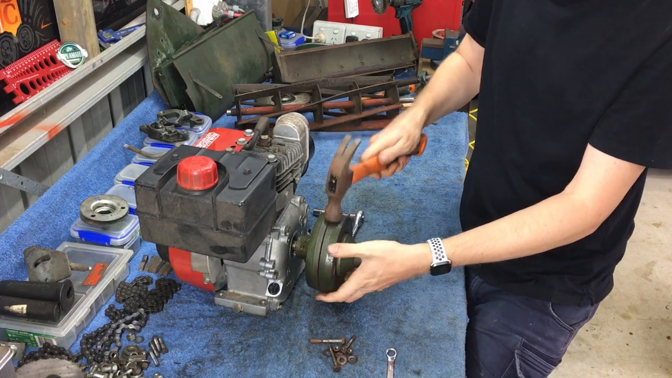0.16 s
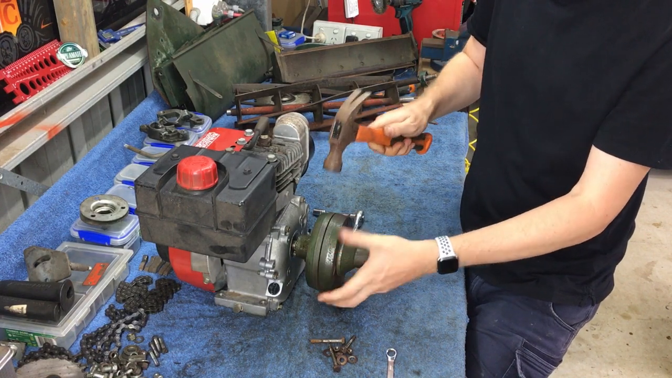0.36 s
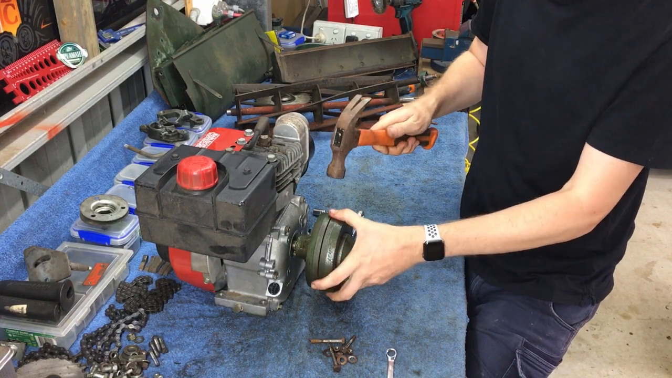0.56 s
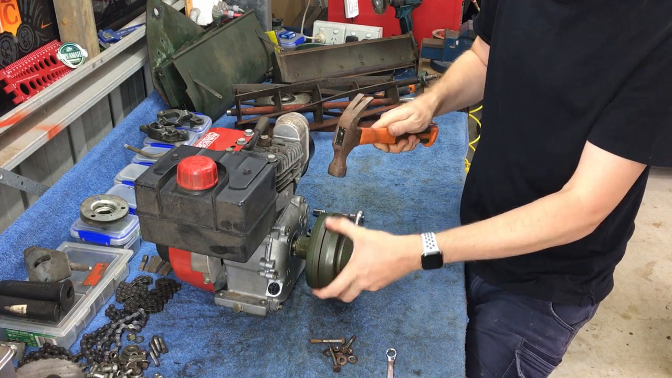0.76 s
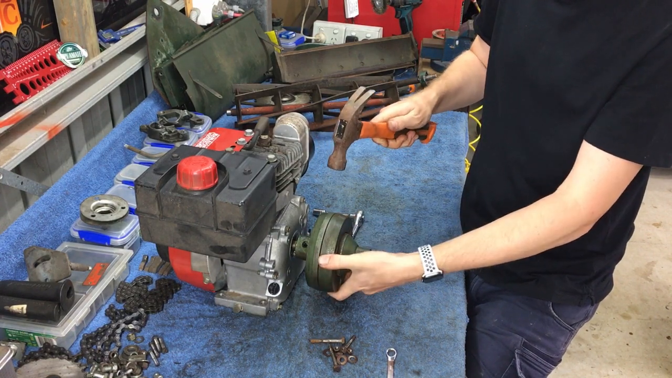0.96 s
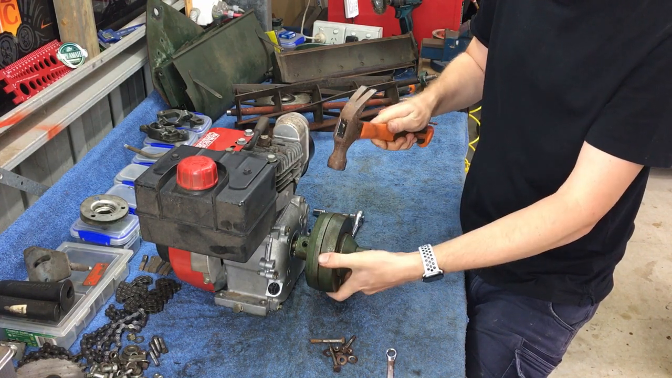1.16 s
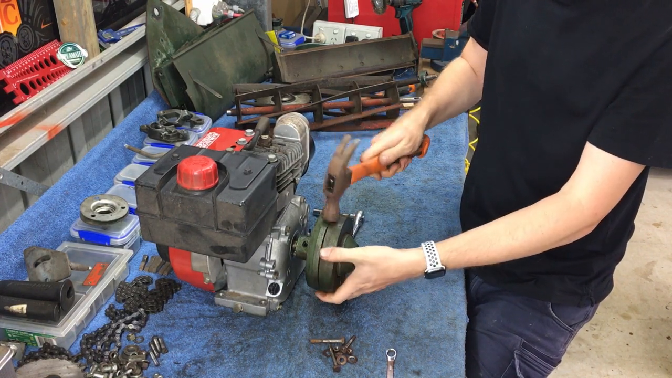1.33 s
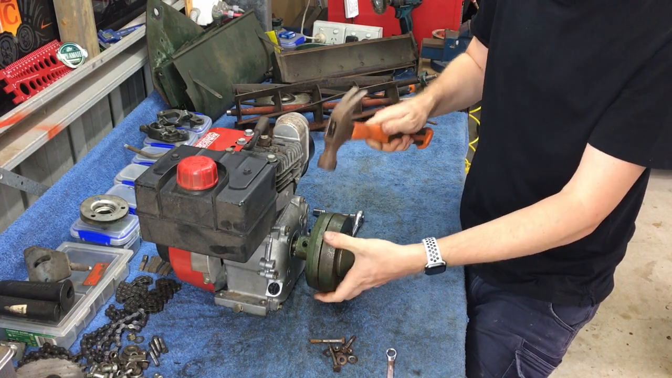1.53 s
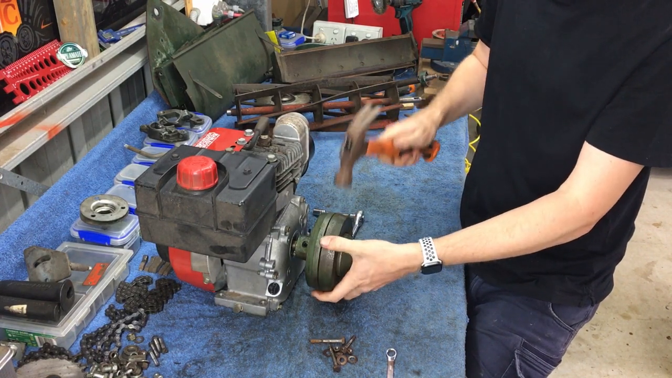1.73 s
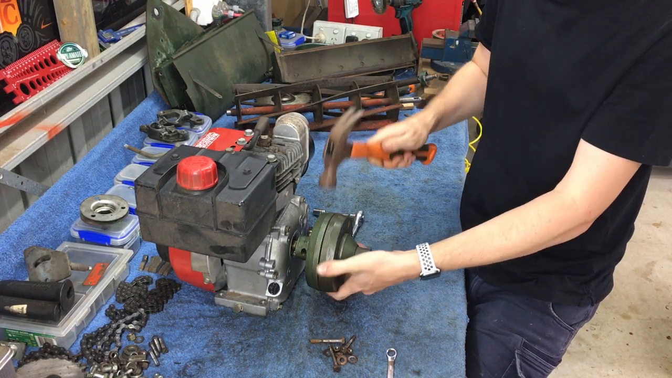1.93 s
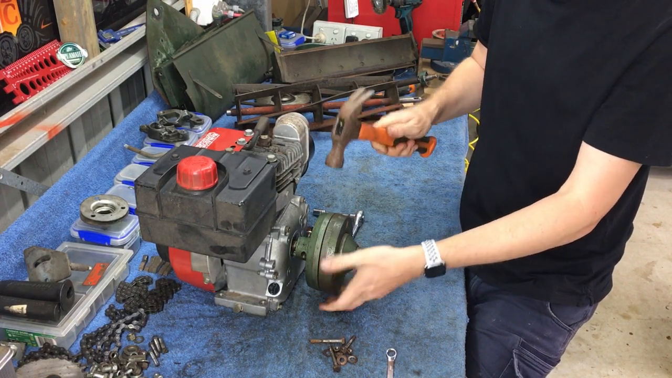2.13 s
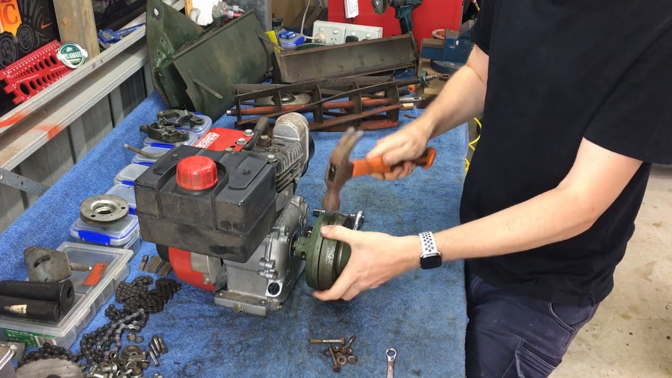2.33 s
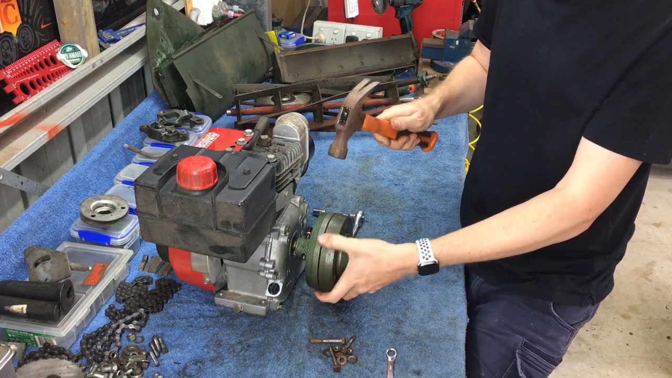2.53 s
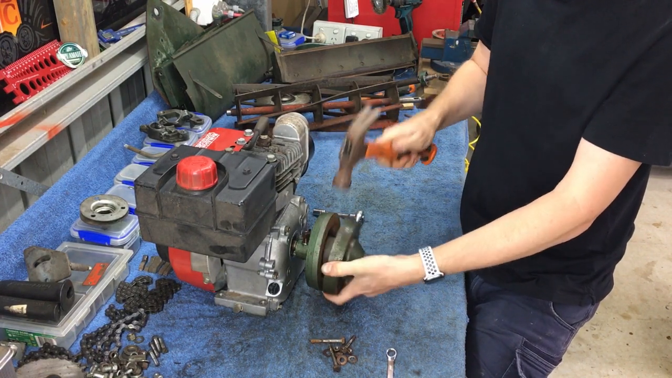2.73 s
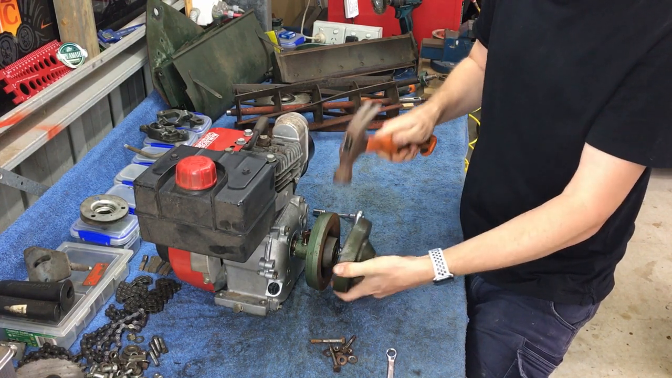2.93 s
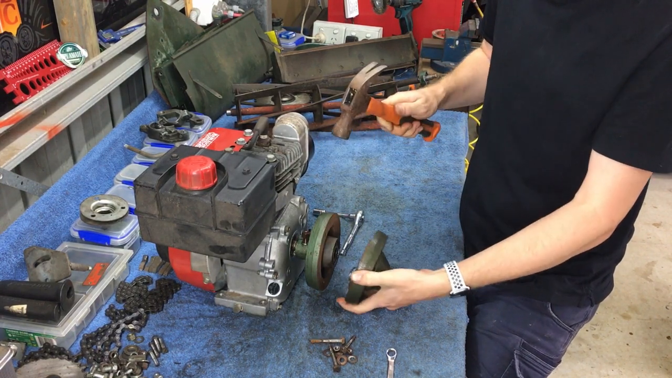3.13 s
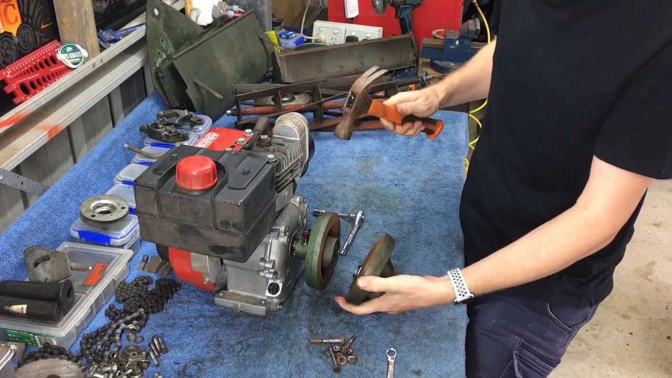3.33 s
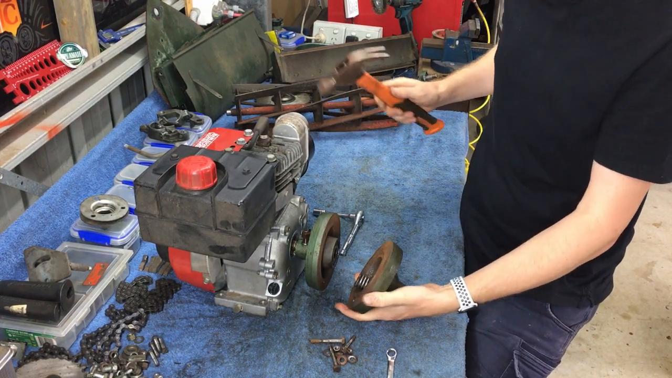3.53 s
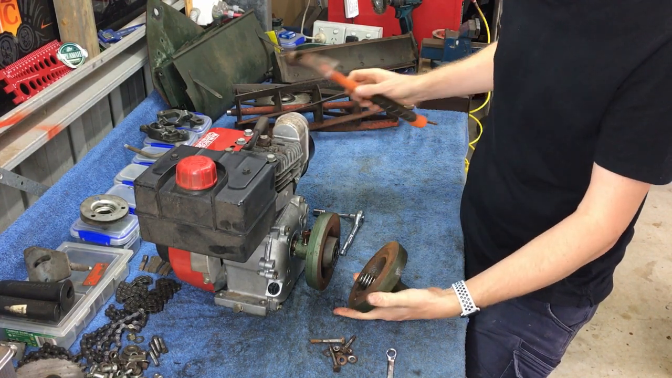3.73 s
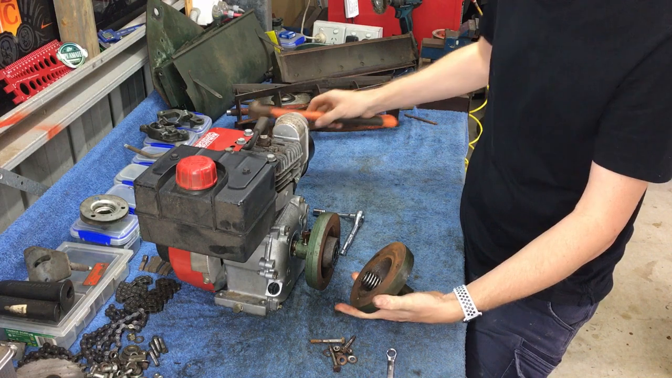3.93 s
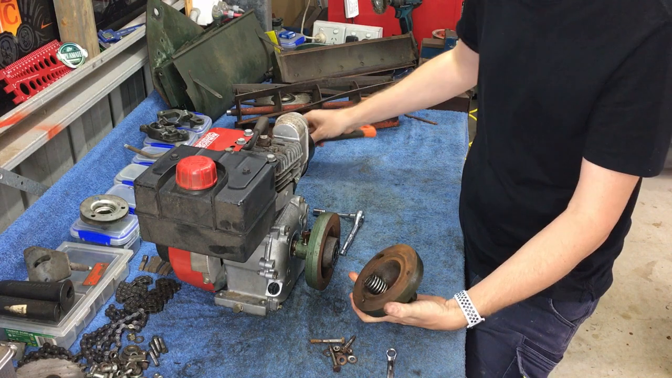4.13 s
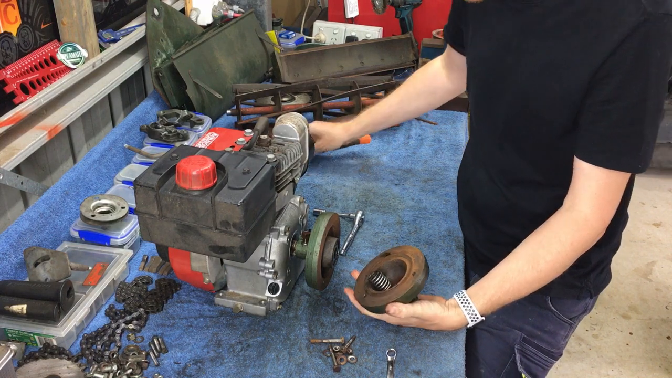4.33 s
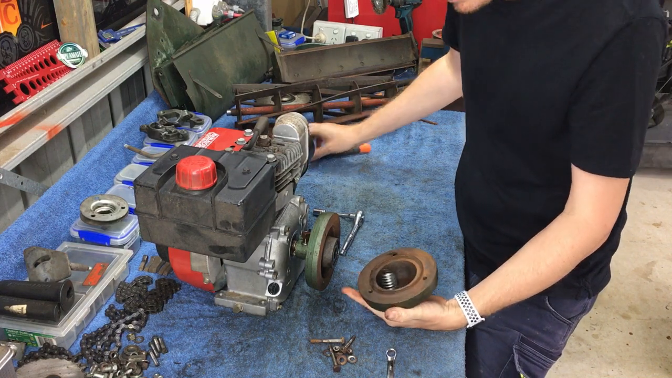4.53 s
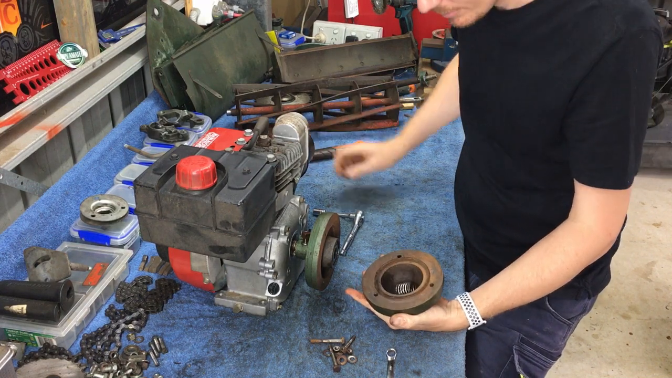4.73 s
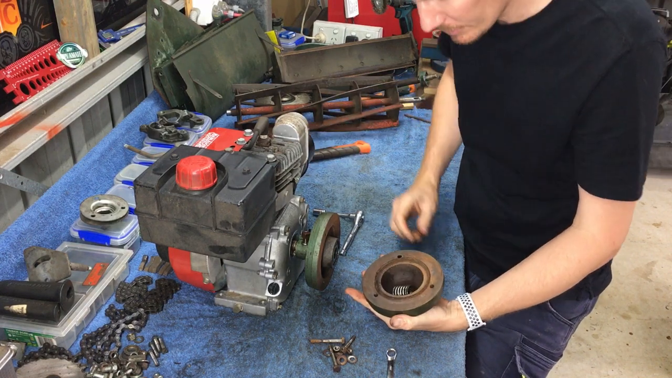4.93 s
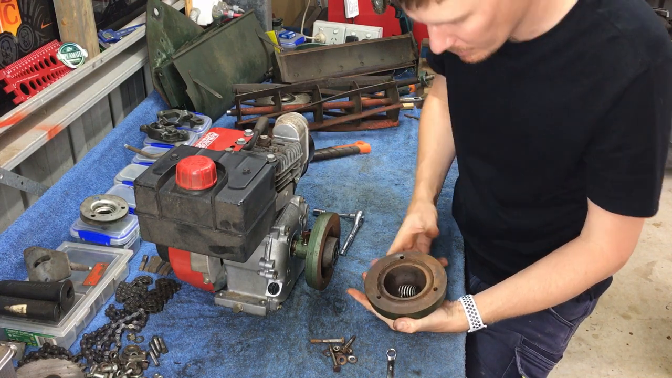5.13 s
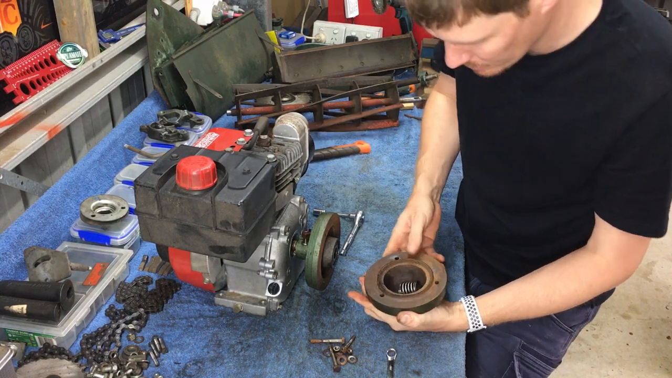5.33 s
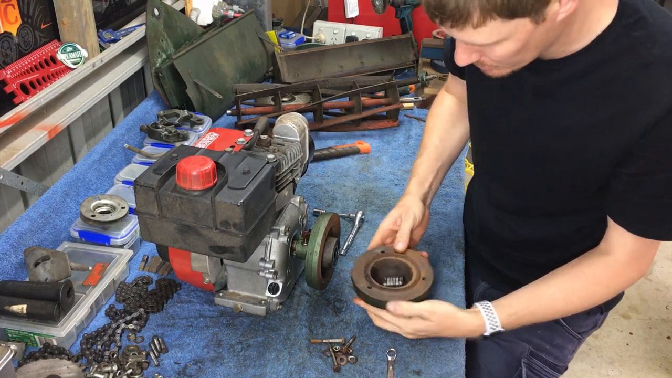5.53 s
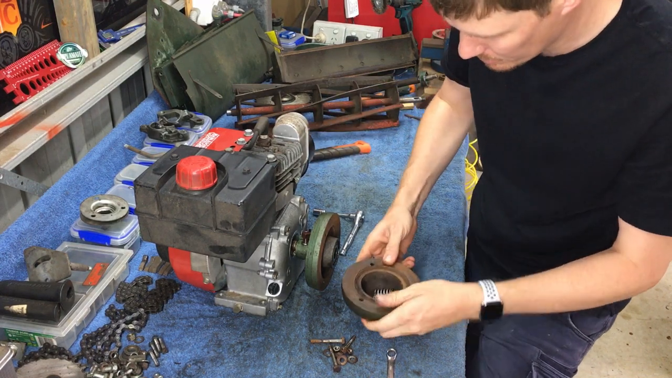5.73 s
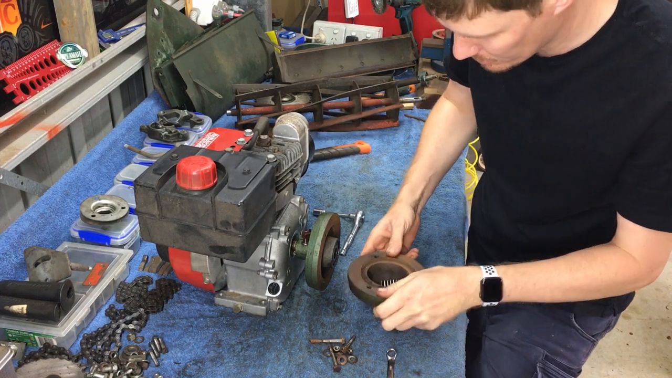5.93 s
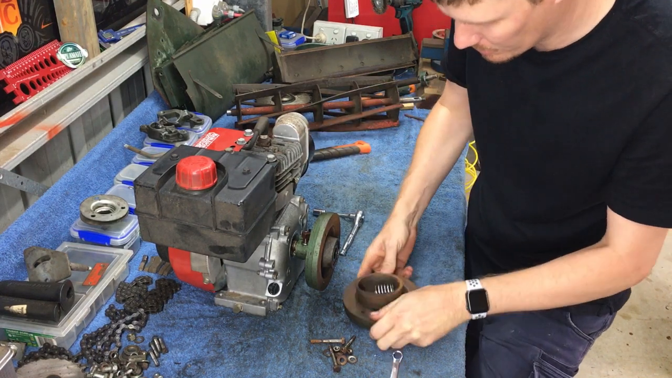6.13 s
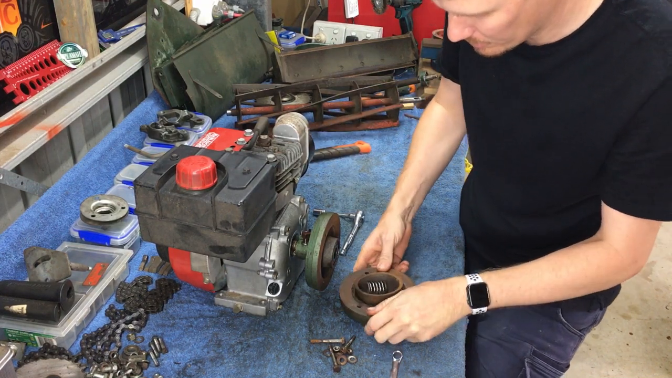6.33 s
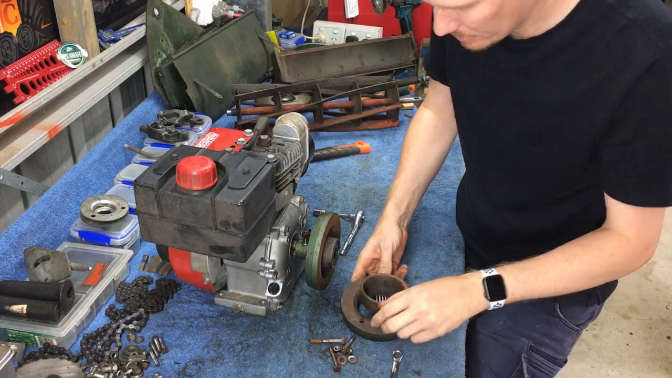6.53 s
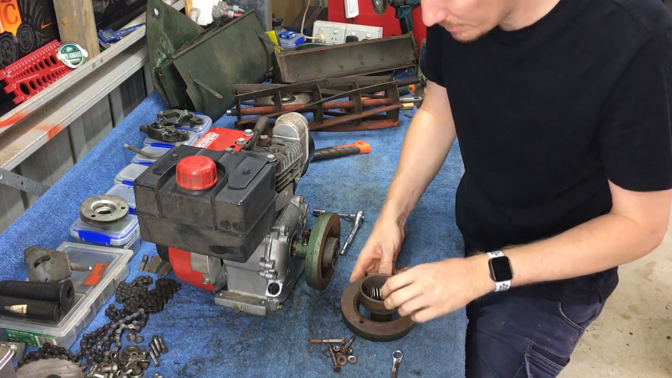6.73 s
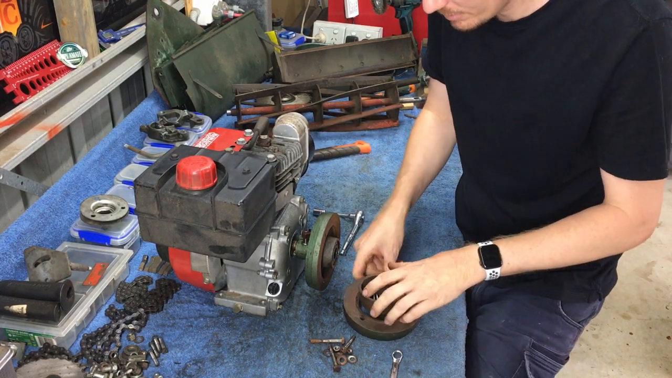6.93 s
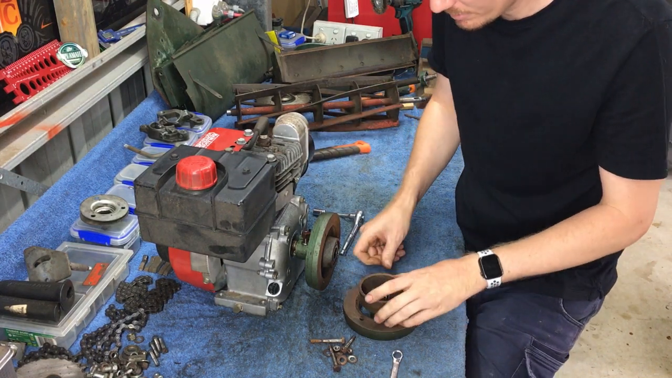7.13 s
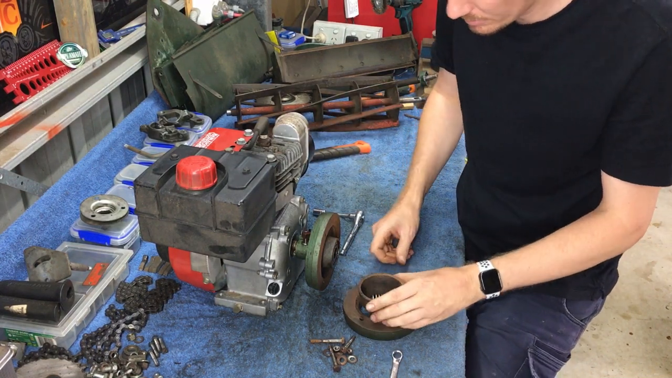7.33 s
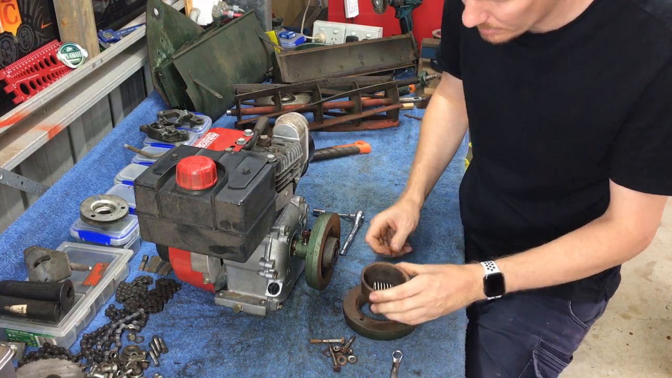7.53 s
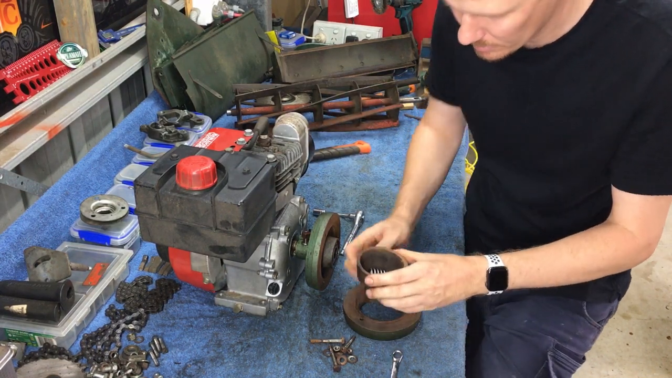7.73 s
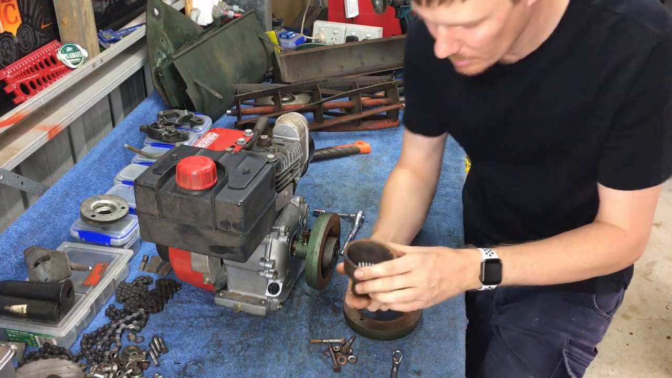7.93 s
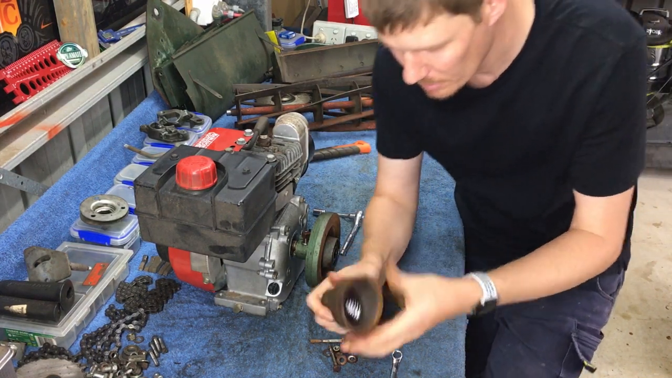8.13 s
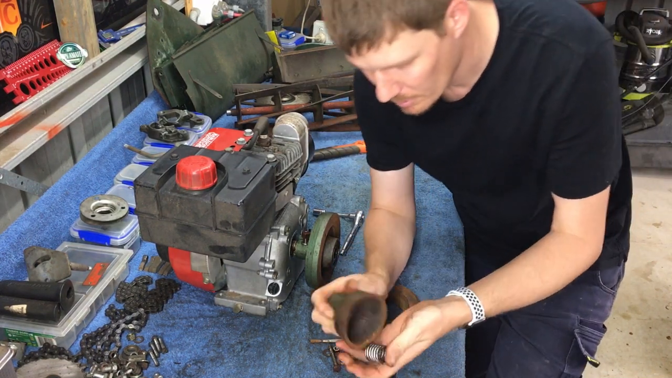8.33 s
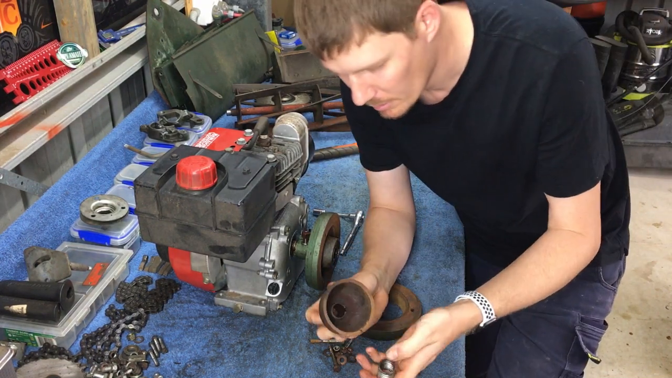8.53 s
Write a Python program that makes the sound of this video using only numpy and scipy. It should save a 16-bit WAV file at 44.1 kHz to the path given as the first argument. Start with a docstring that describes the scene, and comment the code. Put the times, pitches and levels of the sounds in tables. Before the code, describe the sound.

Sharp steel hammer blows ring in a small workshop, followed by soft thumps, a heavy clack, loose metal clinks and a faint gritty scrape.

```python
"""Hammer blows on steel first: a claw hammer taps a small engine's clutch on a mat until the drum comes free.
The hammer and the drum are set down, the drum rocks, and its hub is slid out as loose parts clink.
Steel and bench are sums of decaying sine modes; cracks, knocks, clacks and scrapes are shaped noise.
A small, cluttered workshop surrounds the microphone: noise tails answer the work over a low steady rumble."""
import sys
import numpy as np
from scipy import signal
from scipy.fft import rfft, irfft, next_fast_len
from scipy.io import wavfile
from scipy.ndimage import map_coordinates

SR = 44100
rng = np.random.default_rng(int(sys.argv[2]) if len(sys.argv) > 2 else 0)


def transcribe(signal):
    """Save signal, clipped to [-1, 1], as a 16-bit WAV file at the path in sys.argv[1]."""
    frames = np.atleast_2d(signal).T
    limited = np.clip(frames, -1, 1)
    pcm = np.round(limited * 32767).astype(np.int16)
    wavfile.write(sys.argv[1], SR, pcm)


N = 382347

# noise colour of heavy parts clacking together or on the mat: (frequency [Hz], relative level [dB])
CLACK_COLOUR = [(100, -8.5), (320, 3), (500, -0.5), (700, -4.5), (1200, -8.5), (2200, -16.5), (3500, -27),
                (6000, -33.5), (16000, -39)]


def amp(db):
    """Decibels to gain."""
    return np.exp(np.log(10) / 20 * np.asarray(db))


def unit(x):
    """Scale to rms 1."""
    return x / np.sqrt(np.mean(x ** 2) + 1e-20)


def along(points, hz):
    """Read (frequency [Hz], value) points on a log frequency axis."""
    f, v = np.transpose(points)
    return np.interp(np.log(hz + 1), np.log(f), v)


def second():
    """The time axis of one second."""
    return np.arange(SR) / SR


def add(track, s, x):
    """Mix x into the track from time s."""
    part = track[round(s * SR):][:len(x)]
    part += x[:len(part)]


def hiss(colour, size):
    """Noise of rms 1, its spectrum shaped by a colour table."""
    m = next_fast_len(size)
    gain = amp(along(colour, np.fft.rfftfreq(m, 1 / SR)))
    noise = irfft(rfft(rng.standard_normal(m)) * gain, m)
    return unit(noise[:size])


def fade(t60, attack):
    """A quick rise and an exponential decay of 60 dB in t60 seconds."""
    t = second()
    return amp(-60 * t / t60) * (1 - np.exp(-t / attack))


def ring(modes, scatter_db, attack, tilt_db=0):
    """Damped modes of total power 1, at new strengths for every contact; the struck spot tilts their balance."""
    hz, db, t60 = np.transpose(modes)
    chance = rng.standard_normal((len(hz), 2))
    octaves = np.log2(hz / hz[0])
    gains = amp(db + tilt_db * octaves + scatter_db * chance[:, 0])
    gains = gains * np.sqrt(2) / np.linalg.norm(gains)
    tone = np.zeros(SR)
    for gain, f, life, turn in zip(gains, hz, t60, chance[:, 1]):
        tone += gain * np.sin(2 * np.pi * (f * second() + turn)) * fade(life, attack)
    return tone


def in_shop(x, wet_db):
    """A sound plus the room's diffuse answer, a noise tail in which the treble dies first."""
    # the workshop's reverberation: (frequency [Hz], t60 [s])
    shop_decay = [(100, 0.61), (250, 0.52), (600, 0.36), (1500, .36), (3500, .36), (8000, 0.26),
                  (16000, 0.073)]
    hz, t, z = signal.stft(rng.standard_normal(SR * 3 // 4), SR, nperseg=256)
    decay = amp(-60 * t / along(shop_decay, hz)[:, None])
    build_up = 1 - np.exp(-t / .008)
    tail = signal.istft(z * decay * build_up, SR, nperseg=256)[1]
    answer = signal.fftconvolve(x, tail / np.linalg.norm(tail))[:len(x)]
    return x + amp(wet_db) * answer


def bench(centre_hz, spread, attack):
    """The bench top booms; place and softness of the push favour the modes around one pitch."""
    # modes of the bench top under the engine: (frequency [Hz], relative level [dB], t60 [s])
    bench_modes = [(41.5, -6.5, 0.28), (81, -2.5, 0.18), (107.5, -1.5, 0.23), (162, 0, 0.087),
                   (181, -3, 0.16), (195.6, -2.5, 0.14), (262.5, -8.5, .2), (315.6, -8.5, .16),
                   (372, -6, 0.12), (435.8, -9, 0.21), (548, -19, 0.098)]
    hz, db, t60 = np.transpose(bench_modes)
    gains = amp(db) * np.exp(-.5 * (np.log2(hz / centre_hz) / spread) ** 2)  # spread in octaves
    gains = gains * np.sqrt(2) / np.linalg.norm(gains)
    # the modes swell together and crest one rise time after contact
    t = second() - attack
    swell = np.exp(-2 * (np.minimum(t, 0) / attack) ** 2) * (1 - np.exp(-10 * second() / attack))
    boom = np.zeros(SR)
    for gain, f, life in zip(gains, hz, t60):
        boom += gain * np.cos(2 * np.pi * f * t) * amp(-60 * np.maximum(t, 0) / life)
    return swell * boom


def knock(contact_hz):
    """The engine block's knock; a soft contact lasts longer and so excites less treble."""
    # noise colour of the block: (frequency [Hz], relative level [dB])
    knock_colour = [(200, -15), (400, -4), (620, -11), (900, 2.5), (1150, 2), (1450, -2), (1800, -1.5),
                    (2200, -1.5), (3000, 1), (3600, 1), (4500, -5), (5000, -18), (7000, -33)]
    contact = signal.butter(2, min(contact_hz, SR / 3), fs=SR, output="sos")
    return signal.sosfilt(contact, hiss(knock_colour, SR)) * fade(t60=0.1, attack=0.00058)


def clunk():
    """The heavy drum bumps, a short burst of clack noise."""
    return hiss(CLACK_COLOUR, SR) * fade(t60=0.089, attack=0.0022)


def hammer():
    """Blows crack on the clutch, knock the block and shake the bench; the last frees the drum, which rings."""
    # blows: (time [s], force [dB], clang tilt [dB per octave], set by the spot that is struck)
    blows = [(0.322, -0.5, -0.5), (0.9283, -17.5, 1), (1.471, 0.68, 8), (1.9489, 0.6, 9),
             (2.420, -0.07, -13), (2.948, 3.5, -14)]
    # noise colour of the crack: (frequency [Hz], relative level [dB])
    crack_colour = [(2000, -22), (4500, -4.5), (5100, -1.5), (5800, 2), (7200, 0), (7900, -5.5), (9700, -2),
                    (11000, -11.5), (12600, -7.5), (16000, -13.5)]
    # modes (frequency [Hz], relative level [dB], t60 [s]) of:
    clang_modes = [(2490, -12, .06), (2790, -9, .05), (2890, -1, .075), (3045, -1, .06), (3130, -6, .1),
                   (3400, -10, .06), (3610, -12, .05), (3960, -6, .07), (4085, 0, .05), (4140, -1, .045),
                   (4250, -6, .04), (4550, -6, .06), (4680, -8, .05)]  # hammer head and clutch, brief and loud
    shaft_modes = [(1577, -16, .7), (1990, -13, .4), (2611, -9, .5), (2696, -8, .8), (2745, 0, .78),
                   (3047, -3, .42), (4581, -6, .33), (5889, -6, .25)]  # the lasting ring of the shaft
    freed_modes = [(235, -10, .35), (690, -7, .08), (856, 1.5, .08), (1067, 0, .07), (1577, -23, 1.1),
                   (1787, -7, .08), (2740, -24, 1.2), (2826, 1, .3), (4538, 4, .07), (4680, 0, .08),
                   (5520, -3, .16), (7004, -13, .24), (9800, -8, .06), (12480, -12, .13)]  # the drum as it comes free
    # layers of a blow of force 0 dB
    knock_db, crack_db, clang_db, shaft_db, thump_db = -15.5, -21.5, -9.5, -38, -23
    steel_grows, thump_grows = 1.6, 1.7  # dB per dB of force: a light tap is mostly knock
    contact_hz, contact_grows = 7000, 0.14  # knock's treble limit at force 0 dB; power law of its rise
    free_s = 2.9  # the next blow drives the drum off the shaft
    freed_db, clunk_db = -15, -21
    clang_choke_db, shaft_choke_db = 29.5, 8  # how much less clutch and shaft ring on that blow
    out = np.zeros(N)
    for s, force_db, tilt_db in blows:
        frees = s > free_s
        steel_db = steel_grows * force_db
        crack = amp(crack_db + steel_db) * hiss(crack_colour, SR) * fade(t60=0.085, attack=0.00023)
        block = amp(knock_db + force_db) * knock(contact_hz * amp(force_db) ** contact_grows)
        clang = ring(clang_modes, scatter_db=3, attack=.0012, tilt_db=tilt_db)
        clang *= amp(clang_db + steel_db - frees * clang_choke_db)
        shaft = ring(shaft_modes, scatter_db=1, attack=.001)
        shaft *= amp(shaft_db + steel_db - frees * shaft_choke_db)
        thump = amp(thump_db + thump_grows * force_db) * bench(centre_hz=120, spread=2.5, attack=0.014)
        add(out, s, in_shop(crack, wet_db=-11.5) + in_shop(block, wet_db=-13.5))
        add(out, s, in_shop(clang + thump, wet_db=-17.5) + shaft)
        if frees:
            add(out, s, amp(freed_db) * ring(freed_modes, scatter_db=0.5, attack=.001))
            add(out, s, in_shop(amp(clunk_db) * clunk(), wet_db=-9.5))
    return out


def drum_shift():
    """Just before it comes off, the loosened drum slips on the shaft with a dull knock."""
    out = np.zeros(N)
    slip = amp(-23) * knock(contact_hz=900) + amp(-34) * clunk()
    add(out, 2.8195, in_shop(slip, wet_db=-11.5))
    return out


def set_down():
    """Hammer and drum land on the mat: a softer landing booms lower and purer and clacks less."""
    # landings: (time [s], thump level [dB], pitch [Hz], higher for a harder landing)
    landings = [(4.512, -27.5, 105), (4.591, -38, 164), (4.606, -20.5, 110), (6.176, -34.5, 200),
                (6.188, -12.5, 285), (6.203, -24.5, 277), (6.636, -30, 188), (7.124, -24.5, 213)]
    # a hard landing: pitch, width of its boom, clack over the boom
    hard_hz, hard_spread_oct, hard_clack_db = 287.3, 1, -1.5
    narrowing, clack_loss_db = 0.57, 50  # per octave softer: octaves of width lost, clack lost
    out = np.zeros(N)
    for s, thump_db, pitch_hz in landings:
        softness = np.log2(hard_hz / pitch_hz)  # octaves
        spread = max(hard_spread_oct - narrowing * softness, .1)
        boom = bench(pitch_hz, spread, attack=1.6 / pitch_hz)
        clack = hiss(CLACK_COLOUR, SR) * fade(t60=0.14, attack=0.0033)
        clack *= amp(hard_clack_db - clack_loss_db * softness)
        add(out, s, amp(thump_db) * (in_shop(boom, wet_db=-18.5) + in_shop(clack, wet_db=-15)))
    return out


def drum_rocking(count=3):
    """After landing the drum rocks on its rim, nudging the bench at even intervals."""
    start_s, period_s, level_db = 6.392, 0.049, -44
    out = np.zeros(N)
    for k in range(count):
        nudge = bench(centre_hz=235, spread=0.23, attack=0.00655) + amp(-9) * clunk()
        add(out, start_s + k * period_s, amp(level_db) * in_shop(nudge, wet_db=-5))
    return out


def hub_slide():
    """The hub scrapes out of the drum in gritty noise strokes; the first leaves its spring singing."""
    # strokes of the hub against the drum: (time of peak [s], level [dB])
    strokes = [(8.18, -55.5), (8.58, -64.5)]
    # noise colour of the scrape: (frequency [Hz], relative level [dB])
    scrape_colour = [(400, -14), (1300, 4.5), (2500, 1.5), (4000, -0.5), (6500, -17), (9000, -29),
                     (16000, -34)]
    # modes of the spring inside the hub: (frequency [Hz], relative level [dB], t60 [s])
    spring_modes = [(762, 0, 4.6), (1260, -5, 1.1)]
    rise_db_per_s, fall_db_per_s = 262.5, 130
    grit_hz, grit_db = 390, 2  # rust makes the sliding uneven: catches a second, their depth
    t = np.arange(N) / SR
    pressure = np.zeros(N)
    for s, db in strokes:
        pressure += amp(db - np.maximum(rise_db_per_s * (s - t), fall_db_per_s * (t - s)))
    catches = map_coordinates(rng.standard_normal(N), [t * grit_hz], order=1)
    grit = unit(amp(grit_db * catches))
    out = pressure * grit * hiss(scrape_colour, N)
    add(out, strokes[0][0], amp(-60) * ring(spring_modes, scatter_db=1, attack=.008))
    return out


def loose_parts():
    """Drum, hub, shoes and small hardware tick, ring thinly and may bounce, ever faster and weaker."""
    # contacts: (time [s], ring level [dB], part, number of bounces)
    clinks = [(1.7544, -66, "shoes", 0), (2.833, -62, "shoes", 0), (2.8828, -56.5, "shoes", 0),
              (3.0656, -46.5, "shoes", 2), (3.26, -61, "shoes", 0), (4.29, -65, "drum", 0),
              (4.755, -68, "shoes", 0), (4.861, -49, "shoes", 1), (4.866, -61.5, "drum", 0),
              (5.2939, -59.5, "bolt", 0), (5.3624, -50.5, "bolt", 0), (5.442, -59, "bolt", 0),
              (6.192, -40.5, "washer", 1), (6.3513, -57.5, "shoes", 0), (6.3743, -52, "hub", 0),
              (6.446, -61, "hub", 0), (8.32, -43.5, "hub", 0), (8.3664, -40.5, "hub", 0),
              (8.405, -53.5, "hub", 0)]
    # noise colour of the contact tick: (frequency [Hz], relative level [dB])
    tick_colour = [(700, -20), (1600, -3), (3400, -0.5), (5200, -5.5), (9000, -1.5), (13000, -3),
                   (16000, -6)]
    # modes of each part, some in close pairs that beat: (frequency [Hz], relative level [dB], t60 [s])
    drum_modes = [(2048, -13, 2.4), (2051, -4, 2.6), (3881, 0, .75), (3893, -8, .5)]
    hub_modes = [(2908, -4, 0.33), (2940, -4, 0.15), (6540, 7, 0.1), (7670, -21, .15), (9600, -9, 0.18),
                 (11700, -3.5, 0.11)]
    shoe_modes = [(3934, -7.5, 0.077), (7004, -3, .09), (8750, -1, .09), (9700, -2, .11), (10900, -9, .09),
                  (12740, -3, .07), (15160, -7, .07)]
    washer_modes = [(6600, -6, 0.12), (8460, -1, 0.09), (12110, -3, 0.14), (12400, -3, 0.046),
                    (14160, -5.5, 0.071), (15720, -9.5, 0.13)]
    bolt_modes = [(3220, 2, 0.052), (3240, -5, 0.039), (3510, -4, 0.045)]
    # name -> (modes, contact tick over the ring [dB])
    parts = {"drum": (drum_modes, -14), "hub": (hub_modes, -4), "shoes": (shoe_modes, 6),
             "washer": (washer_modes, 2.7), "bolt": (bolt_modes, -1.27)}
    # first flight, each next flight over the one before, loss per bounce
    flight_s, flight_shrink, bounce_loss_db = 0.026, .7, 3
    out = np.zeros(N)
    for s, ring_db, part, bounces in clinks:
        modes, tick_db = parts[part]
        for k in range(round(bounces) + 1):
            tick = amp(tick_db) * hiss(tick_colour, SR) * fade(t60=.045, attack=0.00047)
            tone = ring(modes, scatter_db=1, attack=0.00031)
            add(out, s, amp(ring_db - k * bounce_loss_db) * in_shop(tick + tone, wet_db=-8.5))
            s += flight_s * flight_shrink ** k
    return out


def rumble():
    """The workshop's low steady rumble, noise that is strongest in the bass."""
    # noise colour of the room: (frequency [Hz], relative level [dB])
    floor_colour = [(12, -45.5), (20, -13), (58, 1), (91, 3.5), (120, -6.5), (204, -6.5), (248, -11.5),
                    (446, -19.5), (527, -22.5), (1440, -29), (1960, -31), (2820, -35), (3950, -34.5),
                    (11400, -45), (16000, -50.5)]
    return amp(-49.5) * hiss(floor_colour, N)


def scene():
    """All the work at the bench over the workshop's rumble."""
    blows = hammer() + drum_shift()
    handling = set_down() + drum_rocking() + hub_slide() + loose_parts()
    return (blows + handling + rumble())[None]


def record(dry):
    """The recorder rounds off the highest peaks, sheds the deepest bass and keeps nothing above its band limit."""
    ceiling, bass_hz, top_hz = .72, 34, 16400  # full scale = 1
    rounded = dry / (1 + np.abs(dry / ceiling) ** 6) ** (1 / 6)
    m = next_fast_len(N + SR)
    hz = np.fft.rfftfreq(m, 1 / SR)
    low_cut = hz ** 3 / np.hypot(hz ** 3, bass_hz ** 3)
    high_cut = np.clip((top_hz - hz) / 600, 0, 1)
    return irfft(rfft(rounded, m) * low_cut * high_cut, m)[:, :N]


dry = scene()
out = record(dry)
transcribe(out)
```